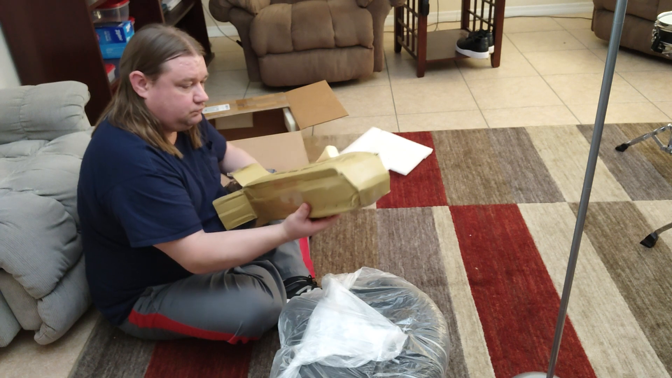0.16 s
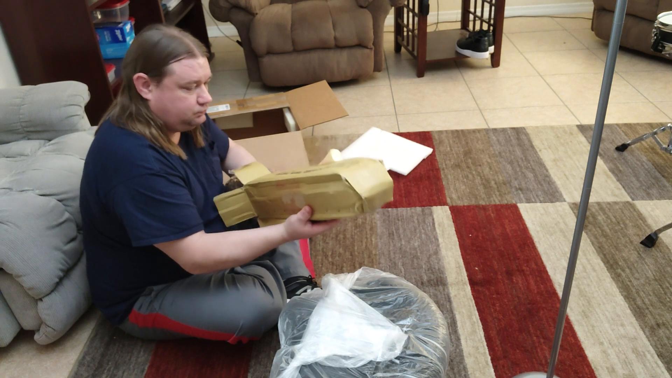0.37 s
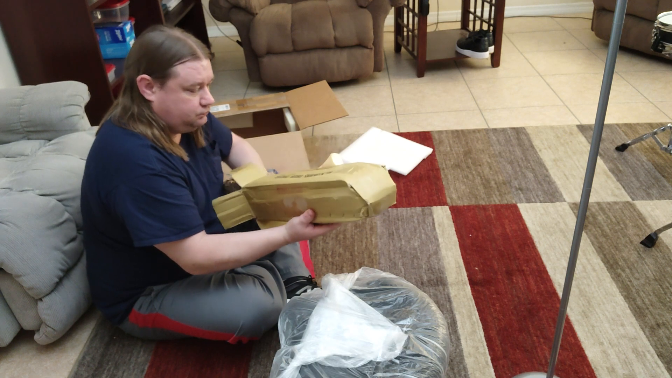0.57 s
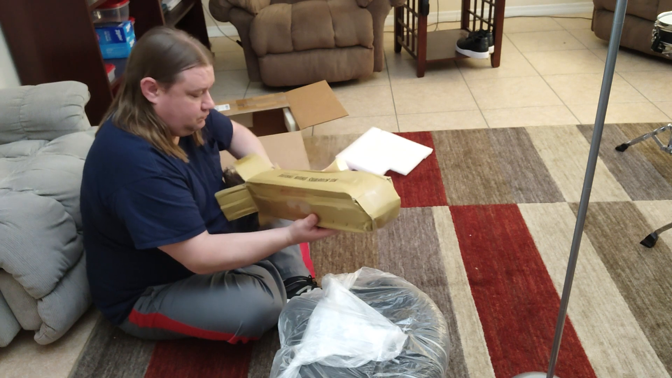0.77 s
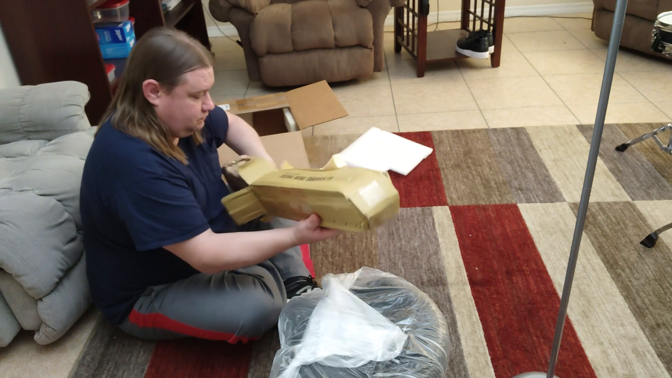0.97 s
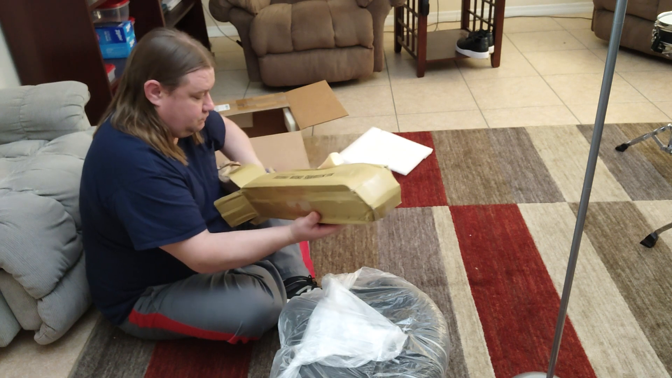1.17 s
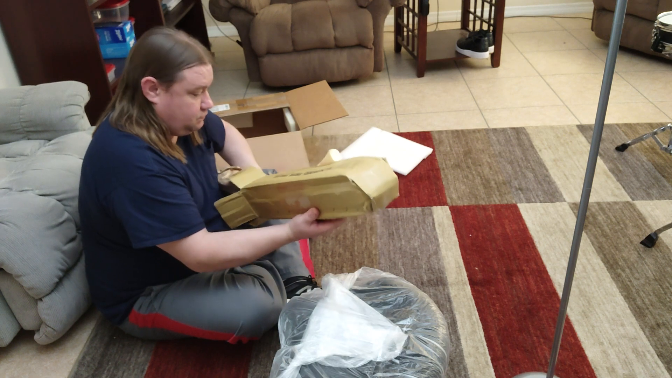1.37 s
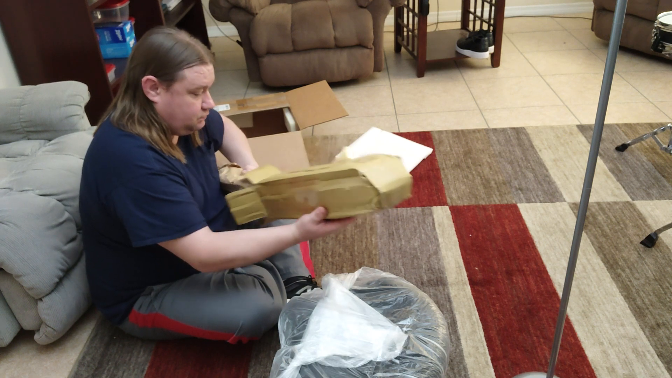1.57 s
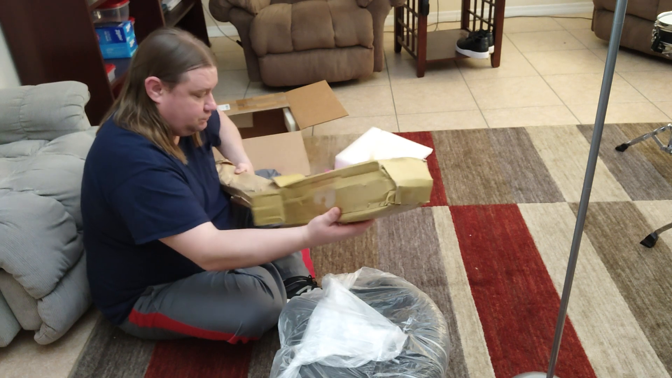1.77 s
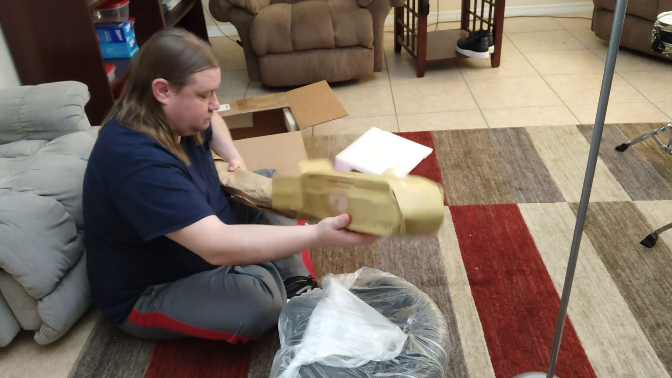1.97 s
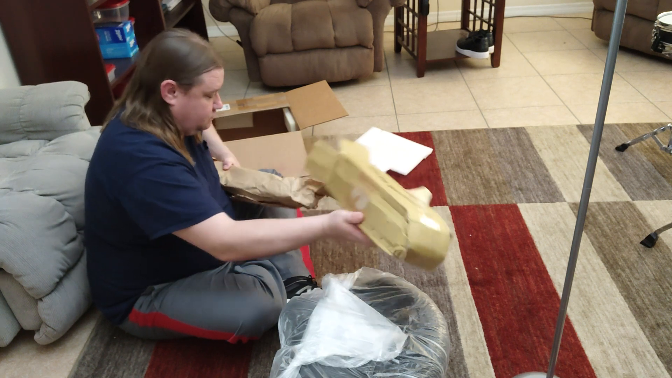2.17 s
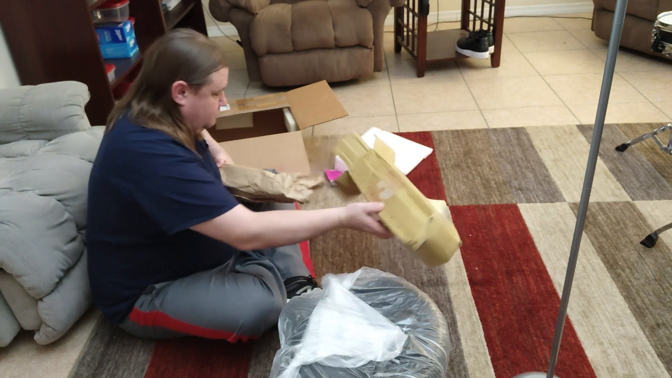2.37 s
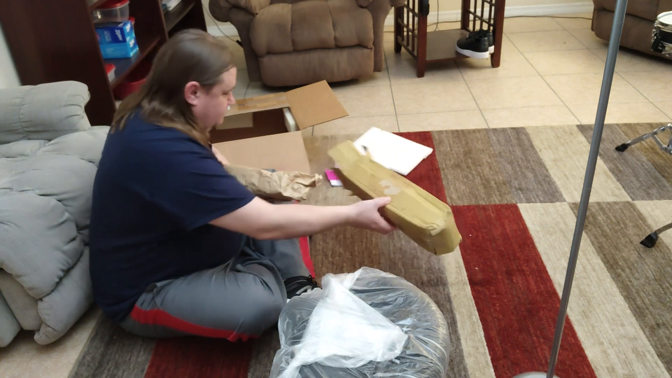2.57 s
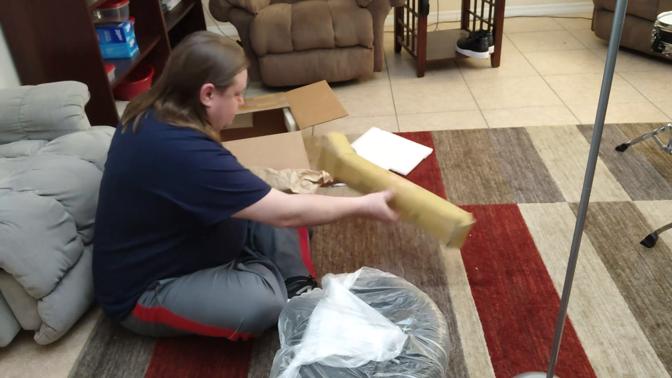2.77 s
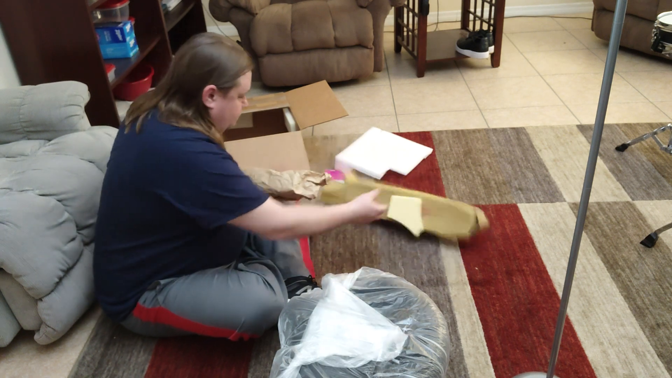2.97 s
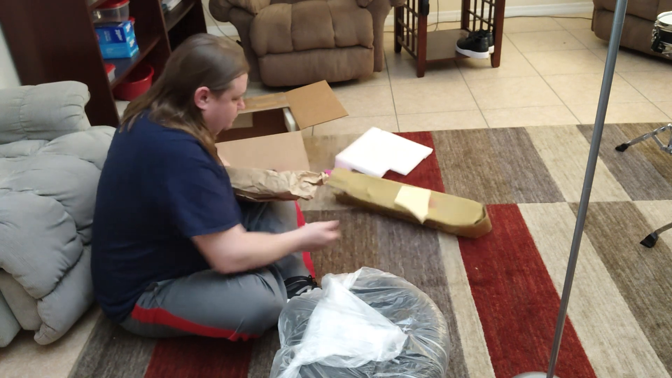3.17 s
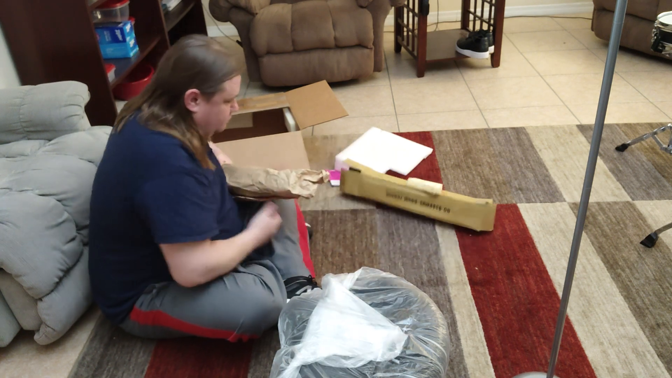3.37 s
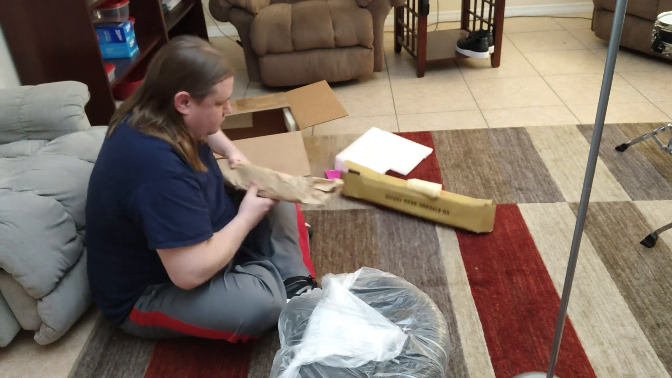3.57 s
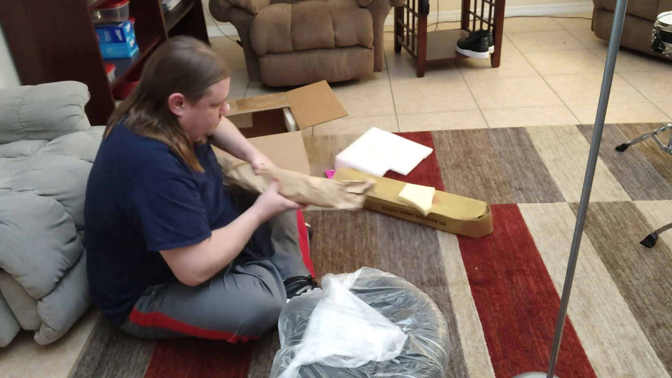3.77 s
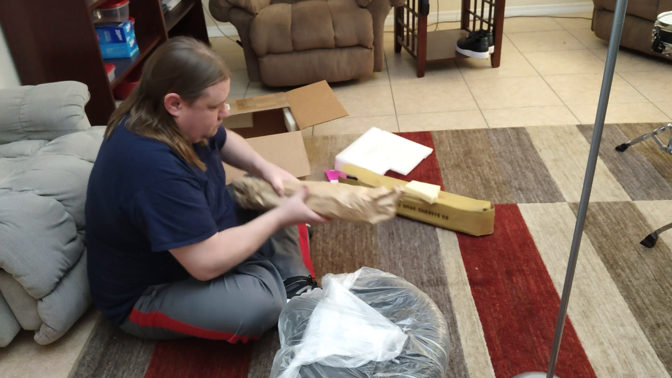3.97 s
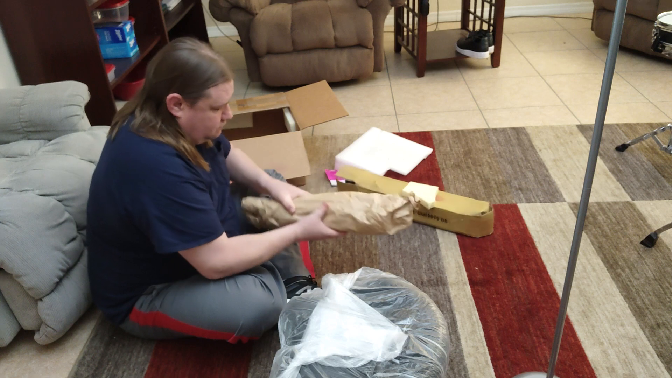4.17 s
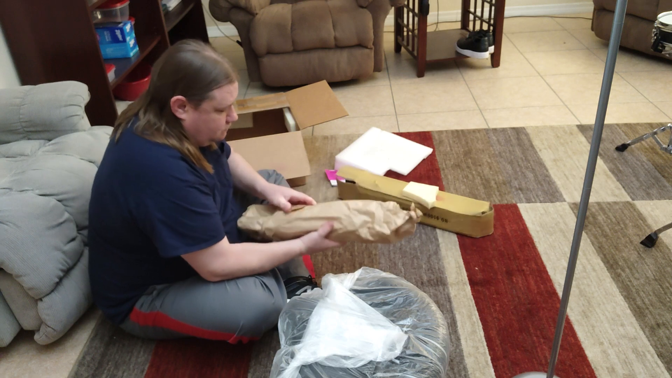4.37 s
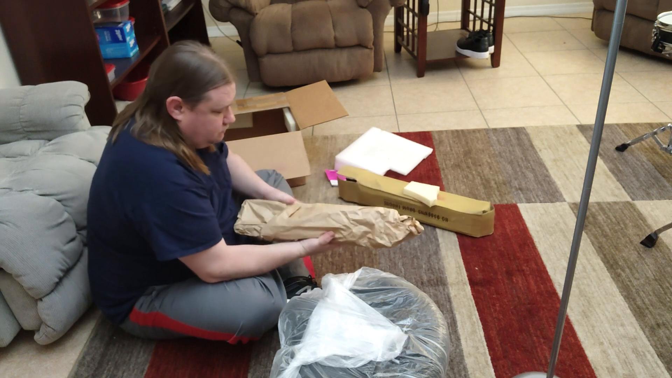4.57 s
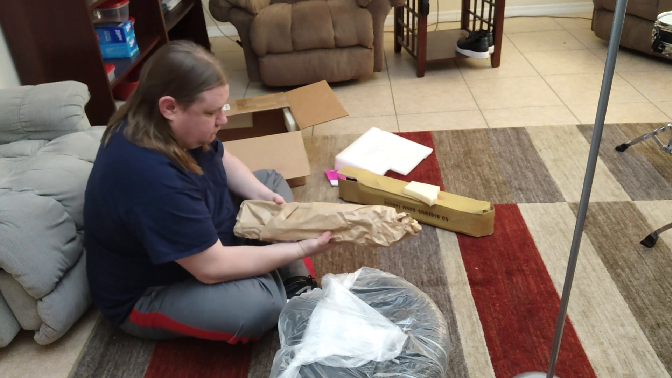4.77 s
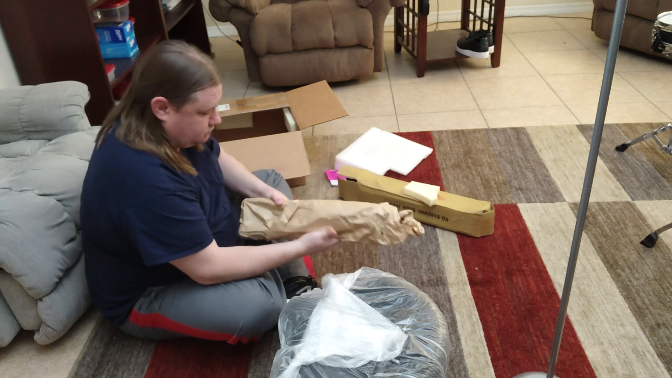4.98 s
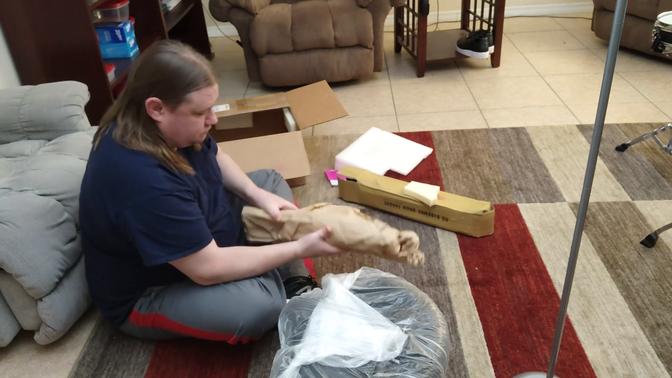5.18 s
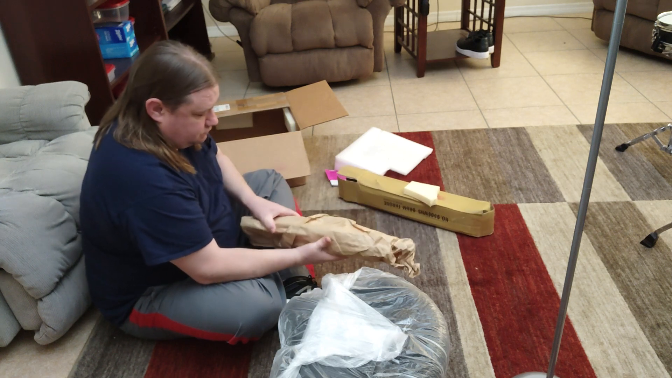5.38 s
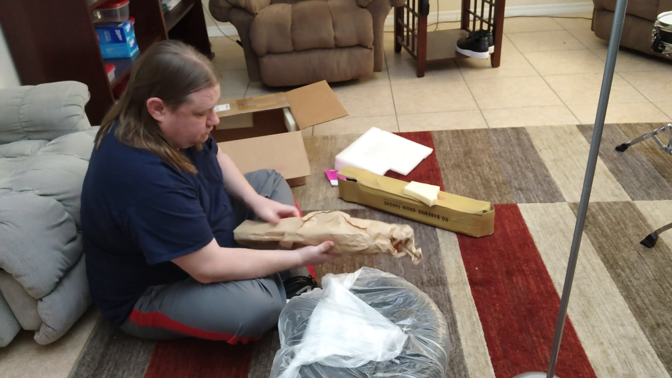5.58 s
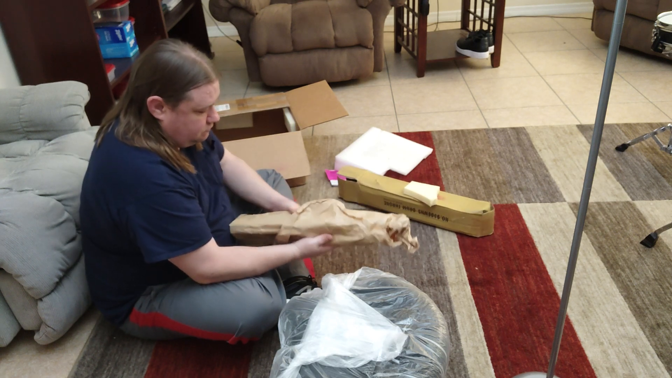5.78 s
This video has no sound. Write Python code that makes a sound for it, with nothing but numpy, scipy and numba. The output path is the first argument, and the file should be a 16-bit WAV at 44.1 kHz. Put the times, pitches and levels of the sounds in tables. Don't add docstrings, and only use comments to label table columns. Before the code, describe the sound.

Close paper crinkling and cardboard rubbing in a tiled living room, a hollow cardboard thunk midway, then brighter, snappier kneading of stiff wrapping paper.

```python
import sys
import numpy as np
from scipy import signal
from scipy.fft import rfft, irfft
from scipy.io import wavfile
from numba import njit

SR = 44100
rng = np.random.default_rng(int(sys.argv[2]) if len(sys.argv) > 2 else 0)


def digitize_waveform(pressure):
    field = np.atleast_2d(pressure).T
    bounded = np.clip(field, -1, 1)
    quanta = np.round(bounded * 32767).astype(np.int16)
    wavfile.write(sys.argv[1], SR, quanta)


def ratio_of_db(decibels):
    return 10 ** (np.asarray(decibels, float) / 20)


N = 256662
SPOTS = 6
TOP_HZ = 15750


def table(rows, hz):
    f, db = np.transpose(rows)
    return np.interp(np.log(np.maximum(hz, 1)), np.log(f), db)


def unit(x):
    return x / np.sqrt(np.mean(x ** 2))


def shaped(x, gain):
    size = x.shape[-1]
    return irfft(rfft(x) * gain(np.arange(size // 2 + 1) * SR / size), size)


def filtered(x, order, hz, kind):
    return signal.sosfilt(signal.butter(order, hz, kind, fs=SR, output="sos"), x)


@njit
def rings(start, hz, t60, size, spot):
    out = np.zeros((SPOTS, N))
    for k in range(len(hz)):
        turn = np.exp(2j * np.pi * hz[k] / SR - np.log(1000.) / (t60[k] * SR))
        z = size[k] + 0j
        first = int(start[k] * SR)
        last = min(N, first + int(t60[k] * SR * 3 / 4))
        for i in range(max(first, 0), last):
            out[spot[k], i] += z.imag
            z *= turn
    return out


def grains(start, hz, t60, size, spot):
    arrays = np.broadcast_arrays(start, hz, t60, size, spot)
    return rings(*(np.ascontiguousarray(a).ravel() for a in arrays))


def columns(rows):
    return np.array(rows)[:, :, None].transpose(1, 0, 2)


def pair(size, alike_hz, most):
    mid, side = rng.standard_normal((2, size))
    alike = lambda f: min(most, 1) / (1 + (f / alike_hz) ** 2)
    mid = shaped(mid, lambda f: np.sqrt(1 + alike(f)))
    side = shaped(side, lambda f: np.sqrt(1 - alike(f)))
    return np.array([mid + side, mid - side]) / 2


# (f/Hz, level/dB per Hz)
AIR_COLOUR = [(18, -52), (62, -3), (131, -13.5), (199, 1.5), (273, -11), (486, -11), (780, -2), (988, -5),
              (9460, -22.5), (13000, -21), (16000, -28)]


def still_air():
    noise = pair(N, 500, 0.43)
    return unit(shaped(noise, lambda f: ratio_of_db(table(AIR_COLOUR, f)))) * ratio_of_db(-61)


def appliance_hum():
    centre_hz, width_hz, level_db = 142, 20, -69
    noise = rng.standard_normal(N)
    hum = shaped(noise, lambda f: 1 / (1 + (2 * (f - centre_hz) / width_hz) ** 2))
    return unit(hum) * ratio_of_db(level_db)


# flexing, creasing, crisp snaps, rubbing hiss (f/Hz)
EFFORT_PITCH = (350, 1500, 3900, 7000)
HELD_STILL = (-65, -86, -70.5, -102)
# (peak t/s, rise t/s, fall t/s, level/dB, tilt/dB per octave)
BUNDLE_SLIDES = [
    (0.0, .1, 0.19, -51.5, -2),
    (0.25, 0.056, 0.13, -47.5, -0.5),
    (1.03, 0.23, 0.14, -37, 0.5),
    (1.3, 0.044, 0.2, -50.5, -1),
    (1.66, 0.11, 0.38, -46, 1.5),
    (1.86, 0.32, 0.16, -43.5, -0.5),
    (2.48, 0.2, 0.07, -48.5, -1.5),
    (2.06, 0.092, .1, -58, 0),
]
# (peak t/s, rise t/s, fall t/s, level/dB, tilt/dB per octave)
PANEL_FLEXES = [(0.25, 0.075, 0.28, -40.5, 1), (0.44, .04, 0.23, -55, 9), (0.88, 0.19, 0.38, -37, 3.5),
                (1.06, 0.23, 0.21, -36.5, 2), (1.3, 0.084, 0.19, -36.5, 1), (1.49, 0.11, 0.47, -39.5, 2.5),
                (1.7, 0.45, 0.3, -45, -0.5), (2.1, 0.071, 0.27, -60, -2.5), (2.5, 0.13, 0.31, -50, 2.5),
                (2.72, 0.035, 0.11, -55, 4), (2.84, 0.034, 0.12, -47.5, 1.5),
                (3.42, 0.044, 0.2, -65.5, -5.5), (3.65, 0.18, .07, -56, -0.5),
                (4.3, 0.052, 0.05, -30.5, 1.5), (4.93, .08, 0.13, -32.5, 3.5), (5.33, 0.15, 0.14, -38, 1.5)]
# (peak t/s, rise t/s, fall t/s, level/dB, tilt/dB per octave)
HAND_SQUEEZES = [(3.6, 0.18, 0.11, -54.5, -2), (3.85, 0.15, 0.29, -57, 1.5), (4.06, 0.15, 0.083, -43, -1.5),
                 (4.29, 0.13, 0.091, -36, -2), (4.37, .08, 0.21, -41.5, -1.5),
                 (4.62, 0.049, 0.097, -44.5, 0.5), (4.8, 0.066, 0.053, -38, -2.5),
                 (4.97, 0.12, 0.16, -37.5, 1.5), (5.13, 0.086, 0.088, -41.5, 0.5),
                 (5.27, 0.13, 0.051, -31, -1), (5.42, 0.067, 0.36, -51.5, -3.5),
                 (5.55, 0.22, 0.12, -58.5, 2), (5.66, 0.17, 0.072, -50, 0.5),
                 (5.73, 0.12, 0.034, -43.5, -2), (5.8, 0.032, .1, -43.5, 0)]
# (peak t/s, rise t/s, fall t/s, level/dB, tilt/dB per octave)
SLEEVE_BRUSHES = [
    (2.365, 0.27, 0.29, -48.5, 0.5),
    (4, 0.18, 0.034, -50, 0.5),
    (3.36, 0.034, 0.38, -68, 0.5),
]
# (t/s, fall t/s, level/dB, tilt/dB per octave)
FOLD_RELEASES = [(0.2, 0.087, -44.5, -4), (0.418, 0.1, -56, 3.5), (0.51, 0.11, -41.5, 0.5),
                 (0.6, 0.038, -47.5, -2.5), (0.702, 0.016, -48, -5), (0.771, 0.33, -41, -3),
                 (1.225, 0.12, -42, -3), (2.131, .05, -50.5, 1.5), (2.804, 0.034, -48, -6.5),
                 (3.008, 0.049, -46.5, -1), (3.062, 0.32, -49, 2.5), (3.64, 0.06, -41, -2),
                 (3.78, 0.039, -49, -4), (4.105, 0.083, -39, -1), (4.15, 0.058, -36, 5),
                 (4.231, 0.12, -39, 3), (4.499, 0.071, -38.5, 1.5), (4.551, 0.03, -30, -1.5),
                 (4.589, 0.06, -32.5, 0), (4.707, 0.023, -41.5, 1.5), (4.841, 0.023, -43, 4),
                 (4.872, 0.3, -34.5, -1.5), (5.095, 0.061, -37.5, -1.5), (5.17, 0.17, -41, 4.5),
                 (5.506, 0.081, -45, -1), (5.759, 0.058, -37.5, 3)]
# (level/dB of each effort), dryness/dB per octave, roundness of the swell
SLIDE_WORK = (-10, -4.5, 0.5, -0.5), 4.9, 1.51
FLEX_WORK = (0, -5.5, -9, -23.5), 1.3, 1.34
SQUEEZE_WORK = (-9.5, -2, -0.5, -6), 1, 1.75
BRUSH_WORK = (-10, -16, 4, 0), -14, 0.8
RELEASE_WORK = (-8.5, -0.5, -1.5, -5.5), -14, 1


def hands(t):
    power = np.ones((len(t), 1)) * ratio_of_db(2 * np.array(HELD_STILL))
    dry = 0
    rise_s = .002
    sudden = [(s, rise_s, *rest) for s, *rest in FOLD_RELEASES]
    gestures = [(BUNDLE_SLIDES, SLIDE_WORK), (PANEL_FLEXES, FLEX_WORK), (HAND_SQUEEZES, SQUEEZE_WORK),
                (SLEEVE_BRUSHES, BRUSH_WORK), (sudden, RELEASE_WORK)]
    for rows, (effort_db, dry_db, roundness) in gestures:
        s, rise, fall, db, tilt = np.transpose(rows)
        away = t[:, None] - s
        reach = abs(away / np.where(away < 0, rise, fall))
        swell_db = np.maximum(-20 * reach ** roundness, -90)
        octaves = np.log2(np.array(EFFORT_PITCH) / EFFORT_PITCH[1])
        colour_db = db[:, None] + effort_db + tilt[:, None] * octaves
        part = ratio_of_db(2 * swell_db) @ ratio_of_db(2 * colour_db)
        power = power + part
        dry = dry + dry_db * part[:, -1]
    return 10 * np.log10(power.T), dry / power[:, -1]


def hollow(x, peaks, share_db):
    ringing = 0
    for hz, width, db in peaks:
        ringing = ringing + ratio_of_db(db) * signal.lfilter(*signal.iirpeak(hz, hz / width, SR), x)
    return x + ratio_of_db(share_db) * ringing


# (f/Hz, level/dB per octave)
SHEET_COLOUR = [(60, -20), (130, -33), (200, -9), (400, -2), (1000, -0.5), (2500, 2), (4500, -2.5),
                (7500, 8.5), (11000, 4), (16000, -8.5)]
# (f/Hz, width f/Hz, level/dB)
SLEEVE_HOLLOW = [(154, 13, 2.5), (600, 59, -3.5), (807, 14, 1), (1620, 38, -9), (2600, 28, -12),
                 (7400, 1200, -26.5)]
# (f/Hz, width f/Hz, level/dB)
BUNDLE_HOLLOW = [(404.4, 27, -7.5), (1510, 8.3, -42.5), (1683, 14, -14), (2710, 32, -9), (4300, 87, -39),
                 (4730, 100, -30)]


def crinkle(count=26000, order=6, cycles=4.7, colour_db=3.0, gain_db=-9.5, dip_db=3.5, dip_s=0.059):
    when = rng.random(count) * N / SR
    effort_db, dry = hands(when)
    spread = np.clip(5 - .45 * dry, 1.5, 7.5)
    snap_db = spread * np.minimum(rng.standard_normal(count), 7 / 3) - spread ** 2 * np.log(10) / 20
    octave = np.sqrt((np.arange(order) + rng.random((count, order)) * 3) / (order + 2))
    hz = 100 * (16000 / 100) ** octave
    weights = [np.interp(np.log(hz), np.log(EFFORT_PITCH), row) for row in np.eye(4)]
    db = sum(w * e[:, None] for w, e in zip(weights, effort_db))
    db = db + snap_db[:, None] + table(SHEET_COLOUR, hz)
    db = db + colour_db * rng.standard_normal(hz.shape) + gain_db
    db = db + dry[:, None] * np.maximum(np.log2(hz / 8000), 0)
    edges = np.sort(np.r_[np.array(EARLY_FOLDS + BUNDLE_FOLDS)[:, 0], N / SR + 1])
    lead = edges[np.searchsorted(edges, when)] - when
    db = db - dip_db * np.maximum(1 - lead / dip_s, 0)[:, None]
    size = ratio_of_db(db) * np.sqrt(hz / 1000 / (2 * octave)) * rng.choice([-1., 1.], hz.shape)
    start = when[:, None] + .0006 * rng.random(hz.shape)
    paper = grains(start, hz, cycles * 3 / hz, size, rng.integers(SPOTS, size=(count, 1)))
    inside = np.arange(N) < 3.45 * SR
    in_sleeve = hollow(paper * inside, SLEEVE_HOLLOW, 0.98)
    in_hands = hollow(paper * ~inside, BUNDLE_HOLLOW, 7.6)
    return in_sleeve + filtered(in_hands, 2, 170, "high")


def buckles(rows, octaves, cycles, crack_s, after_s, gain_db, fade_db, steady, snap_db, order=48):
    s, db, hz = columns(rows)
    chance = rng.random((len(s), 4, order)).transpose(1, 0, 2)
    late = np.arange(order) >= order // 5
    delay = np.where(late, after_s, crack_s) * chance[0]
    away = octaves * (2 * chance[1] - 1) * np.where(np.arange(order) % 3, 1, 1 - steady)
    pitch = np.minimum(hz * 2 ** away, TOP_HZ)
    size_db = db + gain_db - 14.4 * abs(away) - fade_db * delay / after_s + 2.04 * ~late
    size = ratio_of_db(size_db) * np.sign(chance[2] - .5)
    spot = (SPOTS * chance[3, :, :1]).astype(int)
    snap = grains(s, hz * np.array([.7, 1.25]), 4.4 / hz, ratio_of_db(db + snap_db), spot)
    return grains(s + delay, pitch, 3 * cycles / pitch, size, spot) + snap


# (t/s, peak level/dB, f/Hz)
DULL_SHEETS = [(0.202, -39, 1150), (0.24, -25.5, 1850), (0.237, -30, 513), (0.418, -30, 1000),
               (0.515, -30, 638), (0.699, -38, 671), (0.744, -36, 660), (0.77, -36, 1180),
               (1.166, -28.5, 815), (1.226, -40, 1650), (1.256, -29, 676), (1.449, -31.5, 825),
               (1.485, -24.5, 1100), (1.544, -32, 725), (1.608, -28.5, 610), (2.051, -37.5, 1270),
               (2.135, -31.5, 1510), (2.272, -41, 1040), (2.451, -33.5, 1380), (2.488, -28.5, 1890),
               (2.809, -33.5, 473), (3.005, -36, 950), (3.064, -44, 950), (3.125, -26, 646),
               (3.157, -15.5, 667),
               (3.524, -39, 1590), (3.645, -31, 1150), (3.78, -35, 1740), (3.811, -38.5, 880),
                 (3.977, -27, 2260), (4.039, -22.5, 1930), (4.107, -28, 1850), (4.149, -35, 2780),
                 (4.229, -48, 1510), (4.422, -32.5, 614), (4.454, -26.5, 1030), (4.498, -31.5, 1110),
                 (4.534, -33, 1230), (4.552, -22.5, 1380), (4.587, -23, 1090), (4.708, -36, 1180),
                 (4.779, -31.5, 950), (4.842, -23.5, 1030), (4.876, -19, 1130), (5.1, -27, 1150),
                 (5.15, -21.5, 2390), (5.175, -29, 1150), (5.503, -38, 850), (5.611, -47, 1110),
                 (5.679, -28.5, 1480), (5.711, -30, 800), (5.758, -53, 2200)]
# (t/s, peak level/dB, f/Hz)
MORE_PANELS = [
    (0.381, -27, 2200),
    (0.432, -29, 2380),
    (0.594, -37, 1620),
    (4.609, -39, 2060),
    (4.899, -18, 1830),
    (4.964, -20.5, 1840),
    (5.019, -18, 2130),
    (5.266, -21, 2770),
    (5.79, -29, 1310),
]


def panels():
    return buckles(DULL_SHEETS + MORE_PANELS, octaves=0.64, cycles=5.25, crack_s=0.00317,
                   after_s=.045, gain_db=-14.0, fade_db=23.5, steady=0.98, snap_db=-6.5)


# (t/s, peak level/dB, f/Hz)
DULL_POPS = [(0.214, -38, 633), (0.289, -33, 466), (0.848, -29, 604), (0.953, -25.5, 636),
             (1.228, -32, 353), (1.291, -27, 624), (1.341, -26, 1150), (1.399, -33, 785),
             (1.506, -30.5, 640), (1.848, -29.5, 1280), (2.224, -41, 1040), (2.464, -33.5, 630),
             (3.094, -25, 598), (3.134, -15, 590), (3.184, -22, 480), (3.329, -43, 2470),
             (3.439, -37.5, 1440), (4.256, -21, 1120), (4.29, -27, 1380), (4.307, -24, 1510),
             (4.605, -22, 1380), (4.639, -25.5, 1130), (4.954, -21.5, 650), (4.969, -27.5, 396),
             (5.018, -21, 2100), (5.26, -26, 1500), (5.279, -23, 910)]


def pops():
    return buckles(DULL_POPS, octaves=0.47, cycles=6.1, crack_s=0.0025, after_s=0.025,
                   gain_db=-18.0, fade_db=30.0, steady=0.83, snap_db=-7.0)


# (start t/s, length t/s, level/dB, first f/Hz, last f/Hz)
RUBBED_PATCHES = [(0.38, 0.037, -44.5, 2440, 1860), (0.78, 0.17, -44, 1200, 1600),
                  (0.87, 0.3, -44, 7000, 9500), (1.59, 0.4, -41.5, 7700, 8000),
                  (1.98, 0.049, -54, 6500, 6000), (2.303, 0.14, -45, 6300, 6600),
                  (2.299, .11, -56, 3300, 4100), (2.378, .12, -54, 7500, 8300),
                  (3.199, 0.097, -48.5, 710, 540), (4.25, 0.09, -40, 3000, 3700),
                  (4.603, .05, -43.5, 380, 410), (4.869, .12, -41, 386, 430), (4.95, .04, -40, 620, 770),
                  (5.172, .035, -36, 1240, 1040), (5.249, 0.089, -48, 250, 310),
                  (4.74, 0.074, -52, 340, 270), (4.59, .03, -42, 1200, 1180),
                  (4.708, 0.015, -46, 1130, 1100), (4.84, .016, -32, 1070, 1200),
                  (4.3, .025, -39, 1150, 1240), (5.096, 0.044, -41, 1050, 1200),
                  (4.9, 0.054, -34, 1230, 1140), (4.15, .04, -36, 4400, 3600), (0.22, .12, -49.5, 201, 200),
                  (5.27, .06, -45, 205, 208), (3.155, .02, -37, 1010, 950), (5.79, .03, -44, 1800, 1900)]


def patches(octaves=0.083, cycles=10.6, order=300):
    s, length, db, first, last = columns(RUBBED_PATCHES)
    chance = rng.random((len(s), 4, order)).transpose(1, 0, 2)
    glide = first * (last / first) ** chance[0]
    pitch = glide * 2 ** (octaves * (2 * chance[1] - 1))
    swell = np.sin(np.pi * chance[0] ** 0.71) * np.sqrt(length * pitch / (order * cycles))
    size = ratio_of_db(db + 9.5) * swell * (2 * chance[2] - 1)
    spot = (SPOTS * chance[3]).astype(int)
    return grains(s + length * chance[0], pitch, 3 * cycles / pitch, size, spot)


# (t/s, peak level/dB, f/Hz)
EARLY_FOLDS = [(0.2383, -33, 7040), (0.417, -40.5, 6860), (0.514, -33.5, 8500), (0.6994, -43.5, 4430),
               (0.7692, -45.5, 3220), (1.223, -36, 4300), (1.29, -37, 6230), (1.485, -39, 3940),
               (2.1301, -39, 6450), (2.489, -31.5, 8300), (3.006, -37, 4800), (3.0641, -30.5, 5650),
               (3.07, -34, 7000), (3.1573, -30, 4940), (3.6472, -39, 5330), (3.9752, -32.5, 5950),
               (4.0402, -34, 6200)]
# (t/s, peak level/dB, f/Hz)
BUNDLE_FOLDS = [(4.1053, -32.5, 5500), (4.15, -21, 3940), (4.232, -26, 4300), (4.2568, -32, 7330),
                (4.307, -26, 5830), (4.34, -18.5, 7000), (4.4295, -35, 4080), (4.4544, -33.5, 7100),
                (4.4989, -28.5, 7200), (4.5491, -26, 6700), (4.5882, -23.5, 6800), (4.7095, -36.5, 6270),
                (4.785, -32.5, 4640), (4.816, -27.5, 6000), (4.8743, -25.5, 4550), (4.893, -26, 4270),
                (4.9316, -30, 7100), (4.9545, -25, 4320), (5.02, -28, 5950), (5.0954, -27, 7800),
                (5.152, -33, 7840), (5.175, -25, 8600), (5.253, -22, 7340), (5.261, -32, 4890),
                (5.2762, -26.5, 7260), (5.505, -35.5, 6700), (5.611, -34, 5460), (5.699, -37, 4700),
                (5.7594, -28, 5370), (5.7967, -32, 6540)]


def fold_edges():
    return buckles(EARLY_FOLDS + BUNDLE_FOLDS, octaves=1.09, cycles=3.9, crack_s=0.0012, after_s=0.031,
                   gain_db=1.0, fade_db=31.0, steady=0.34, snap_db=5.0)


# (t/s, peak level/dB, f/Hz)
SMALL_TICKS = [(0.609, -37, 7340), (0.955, -23, 6200), (0.9773, -24, 6700), (1.2574, -39, 3820),
               (1.61, -28, 7500), (1.8494, -36, 7130), (2.0128, -35.5, 4740), (3.163, -32.5, 4460),
               (4.1249, -25.5, 5700), (4.1574, -21, 4180), (4.2457, -24, 6980), (4.2577, -22, 7300),
               (4.2794, -35, 4510), (4.355, -20, 7800), (4.5924, -35, 6750), (4.6066, -32, 5510),
               (4.843, -36, 7430), (4.8829, -30, 4900), (4.9362, -20, 3620), (4.9662, -21.5, 3960),
               (4.9768, -23, 3650), (5.018, -31, 6050), (5.1187, -35, 8160), (5.2842, -28, 7270),
               (5.3348, -42.5, 3590), (5.468, -32, 4300), (5.6296, -30.5, 4760), (5.7684, -35, 5070),
               (5.7794, -31, 6490)]


def ticks():
    return buckles(SMALL_TICKS, octaves=1.15, cycles=2.3, crack_s=0.001, after_s=0.011,
                   gain_db=-4.5, fade_db=24.0, steady=0.29, snap_db=2.5)


# (t/s, rumble level/dB, scuff level/dB)
SLEEVE_LANDING = [
    (3.055, -60, -78),
    (3.06, -28, -44),
    (3.172, -34, -54),
    (3.24, -39, -67),
    (3.3, -53, -85),
    (3.342, -71, -57.5),
]
# (t/s, peak level/dB, f/Hz)
SLEEVE_BLOWS = [
    (2.702, -35, 594),
    (2.714, -33.5, 600),
    (2.808, -43, 600),
    (2.841, -24, 586),
    (3.058, -26, 595),
    (3.109, -14, 600),
    (3.158, -5.5, 603),
    (3.161, -15, 630),
    (3.165, -31, 617),
    (3.209, -18, 600),
]
# (f/Hz, level/dB, time to fall 60 dB t/s)
CARDBOARD_MODES = [(200, -4, 0.035), (276, -6, 0.03), (397, -5, 0.092), (464, -9.5, 0.05), (554, -4, 0.03),
                   (600, -2.5, 0.021), (686, -10.5, 0.029), (800, -17, .03), (886, -7.5, 0.046),
                   (1040, -11, 0.018), (1310, -14, 0.029), (1590, -10, 0.026), (1850, -8, 0.014),
                   (2200, -13, 0.01), (2600, -4.5, 0.011), (3100, -5.5, 0.0069)]


def sleeve_drop(push_s=0.00253, tilt_db=7.0):
    t = np.arange(N) / SR
    s, rumble_db, scuff_db = np.transpose(SLEEVE_LANDING)
    on = (t > s[0]) & (t < s[-1])
    grit = unit(rng.standard_normal(N) * ratio_of_db(4 * rng.standard_normal(N)))
    hz, db, t60 = np.transpose(CARDBOARD_MODES)
    poles = np.exp(2j * np.pi * hz / SR - np.log(1000) / (t60 * SR))

    def body(x):
        return sum(ratio_of_db(g) * signal.lfilter([1], [1, -p], x).imag for g, p in zip(db, poles))

    rumble = body(grit * on * ratio_of_db(np.interp(t, s, rumble_db))) / np.std(body(grit)) * ratio_of_db(-9.5)
    scrape = shaped(grit, lambda f: f / 1500 / (1 + (f / 1500) ** 2) / np.sqrt(1 + (f / 7000) ** 4))
    scuff = unit(scrape) * on * ratio_of_db(np.interp(t, s, scuff_db) + 1.0)
    when, blow_db, blow_hz = columns(SLEEVE_BLOWS)
    size = ratio_of_db(blow_db + db - 12.0 - tilt_db * abs(np.log2(hz / blow_hz)))
    size = size * rng.choice([-1., 1.], (len(when), len(hz)))
    start = when + push_s * rng.random(size.shape)
    pitch = hz * 2 ** (0.076 * (rng.random(size.shape) - .5))
    knocks = grains(start, pitch, t60, size, rng.integers(SPOTS, size=when.shape))
    place = np.interp(t, s[[0, -1]], [0, SPOTS - 1])
    moving = np.clip(1 - abs(np.arange(SPOTS)[:, None] - place), 0, 1)
    return (rumble + scuff) * np.sqrt(moving) + knocks


def room(x):
    bass_t60_s, treble_t60_s, gap_s, level_db = 0.22, 0.15, 0.0028, 0
    t = np.arange(SR // 3) / SR
    out = 0
    for spot in x:
        echoes = pair(len(t), 570, 0.96) * (t > gap_s)
        low = filtered(echoes, 1, 1500, "low")
        tail = low * ratio_of_db(-60 * t / bass_t60_s) + (echoes - low) * ratio_of_db(-60 * t / treble_t60_s)
        tail = tail / np.sqrt(np.mean(np.sum(tail ** 2, axis=1)))
        out = out + signal.fftconvolve(spot[None], tail, axes=1)[:, :N]
    return out * ratio_of_db(level_db)


def two_ports(near):
    lag_samples, spread_samples = 1.5, 1.64
    lag = lag_samples + spread_samples * np.linspace(-1, 1, SPOTS)[:, None]
    left = shaped(near, lambda f: np.exp(-2j * np.pi * f * lag / SR))
    return np.array([left.sum(0), near.sum(0)])


def scene():
    drop = sleeve_drop()
    near = crinkle() + panels() + pops() + patches() + fold_edges() + ticks() + drop
    floor = filtered(ratio_of_db(-18.5) * near + ratio_of_db(-17.0) * drop, 2, (50, 88), "band")
    near = floor + filtered(near, 4, 125, "high")
    return two_ports(near) + room(near) + still_air() + appliance_hum()


def roll_off(x):
    return signal.sosfilt(signal.butter(12, 16820, fs=SR, output="sos"), x)


def record(dry):
    steep = signal.ellip(10, .2, 80, TOP_HZ, fs=SR, output="sos")
    mix = signal.sosfilt(steep, dry)
    return roll_off(mix)


dry = scene()
out = record(dry)
digitize_waveform(out)
```